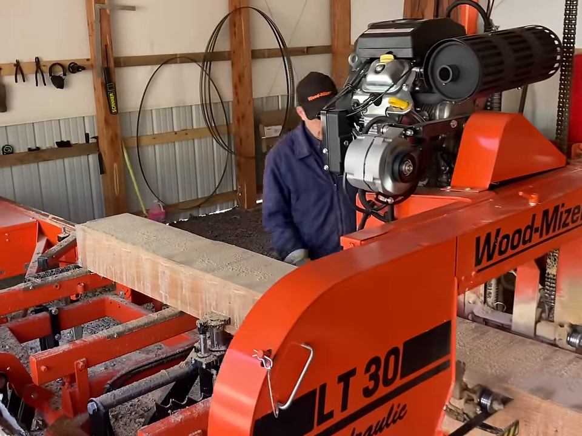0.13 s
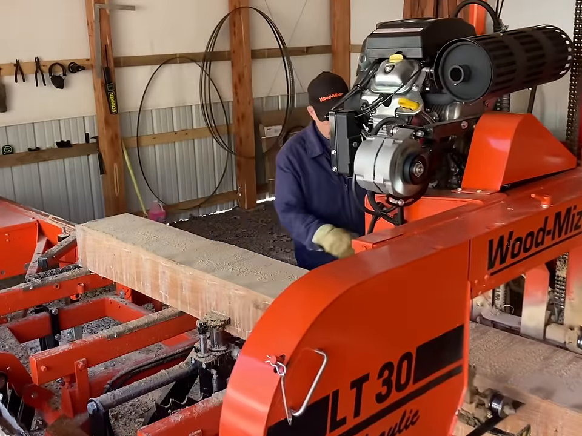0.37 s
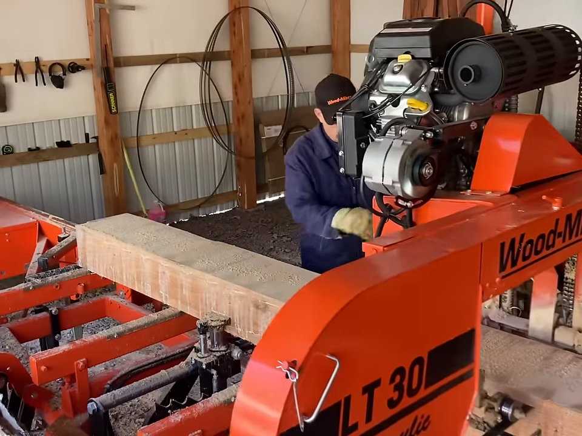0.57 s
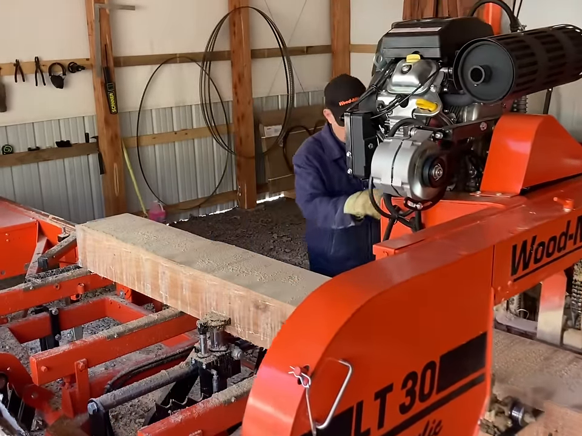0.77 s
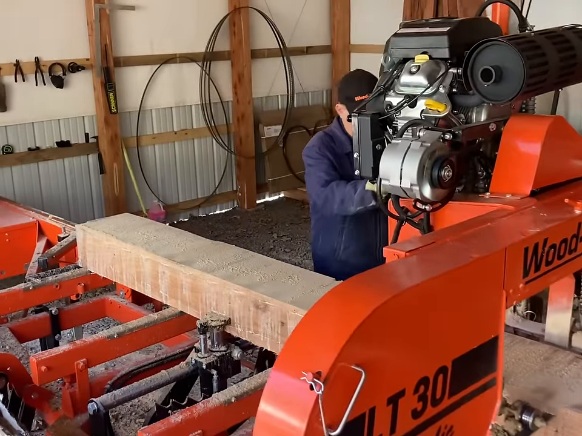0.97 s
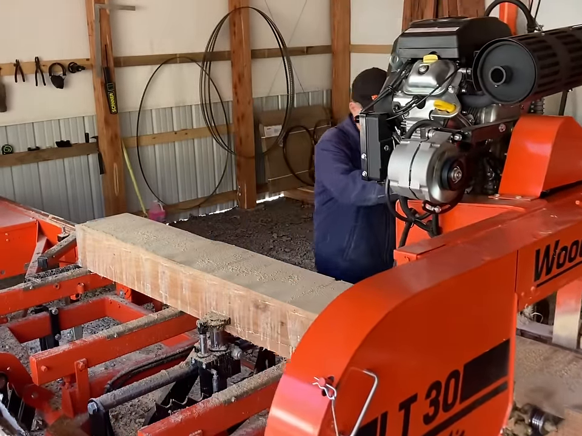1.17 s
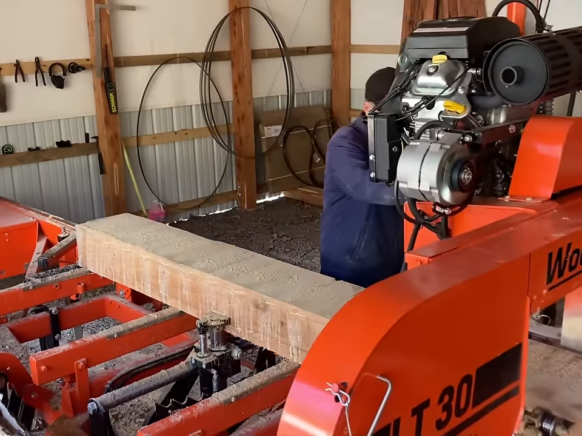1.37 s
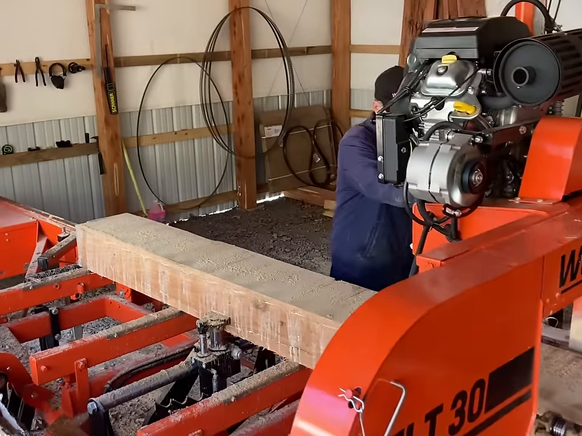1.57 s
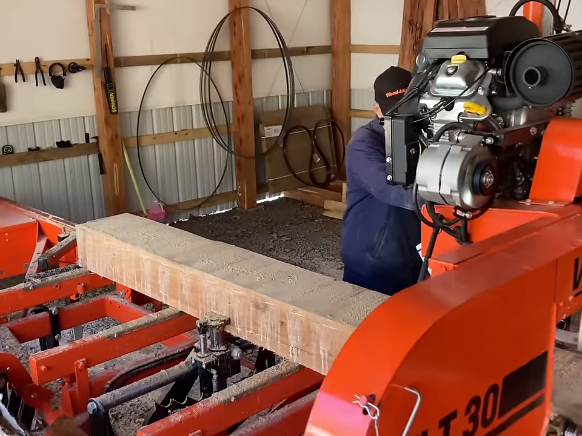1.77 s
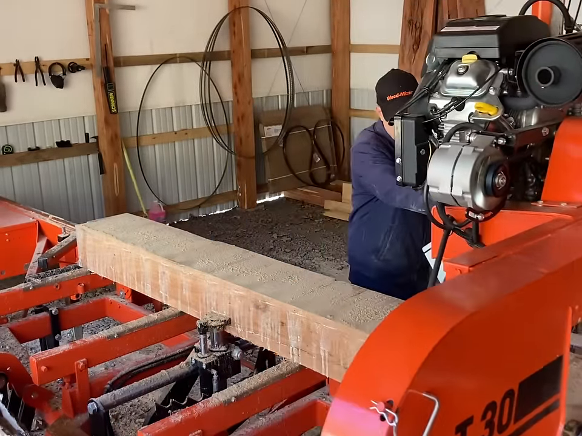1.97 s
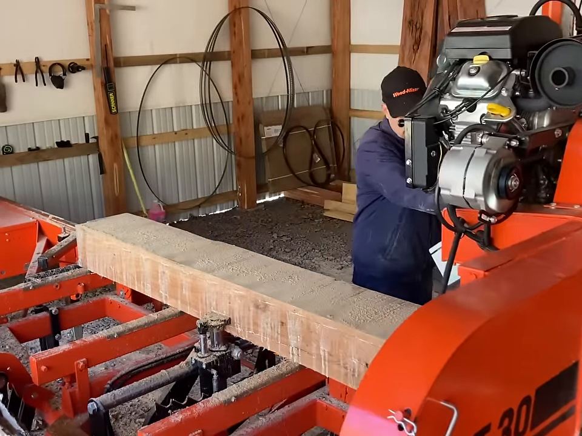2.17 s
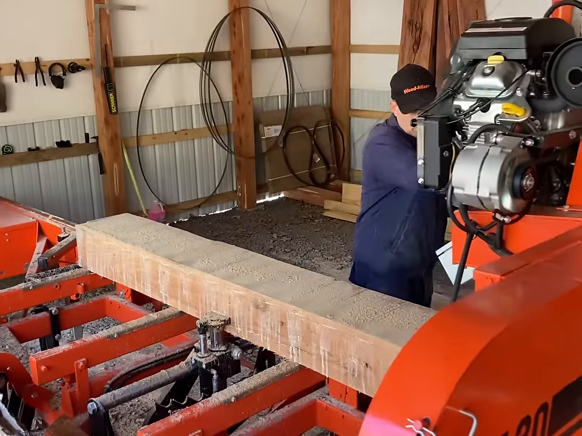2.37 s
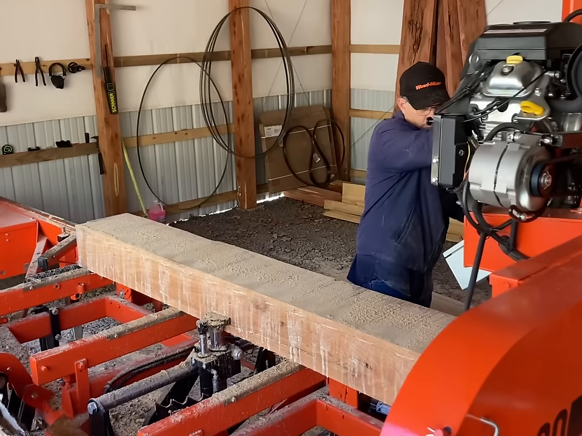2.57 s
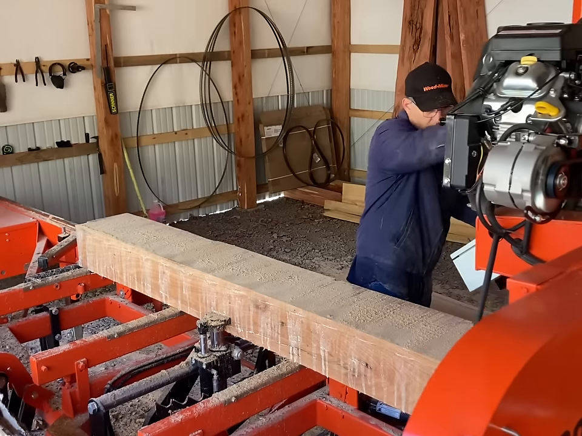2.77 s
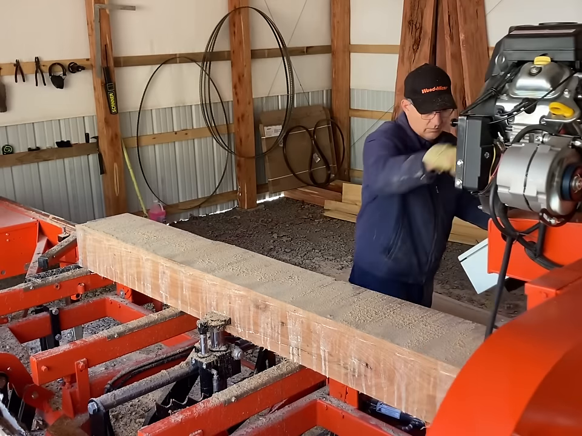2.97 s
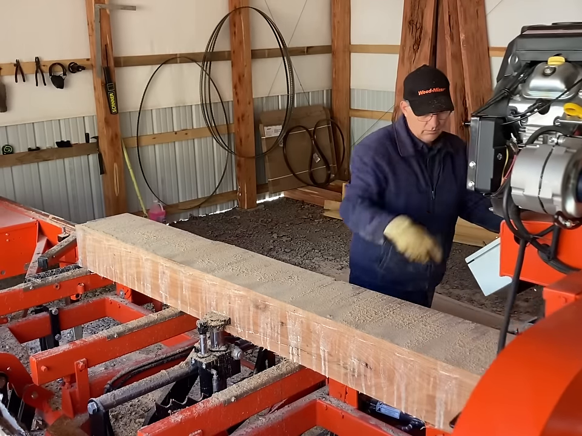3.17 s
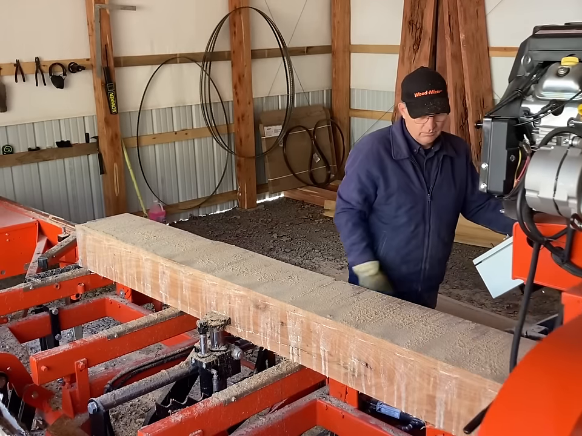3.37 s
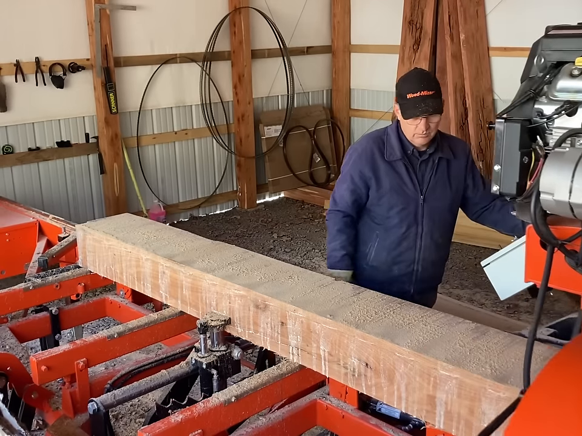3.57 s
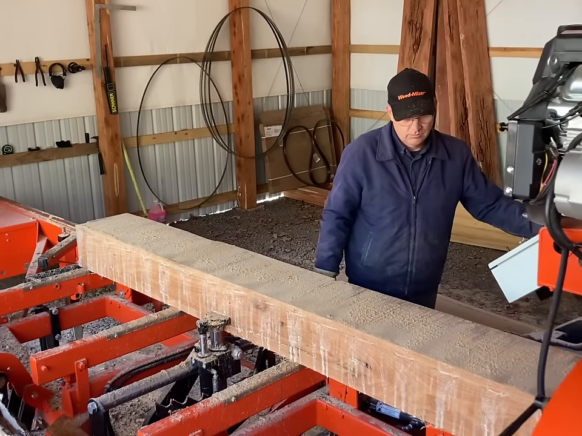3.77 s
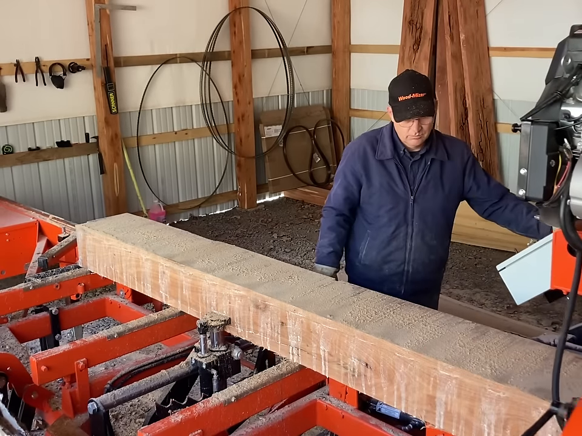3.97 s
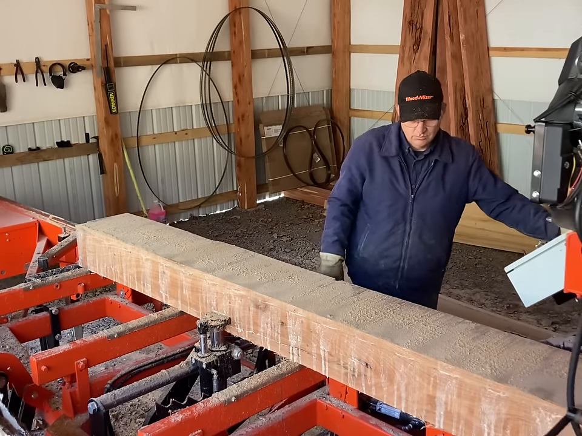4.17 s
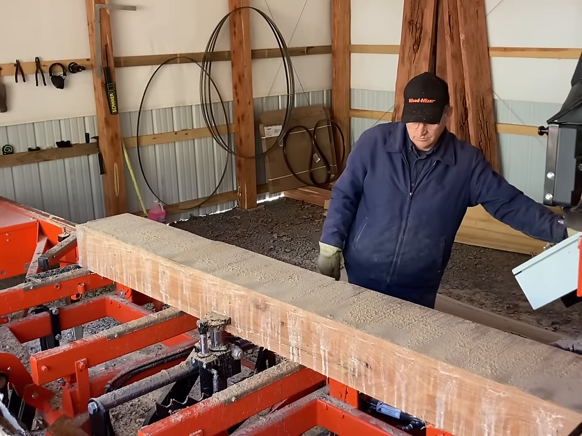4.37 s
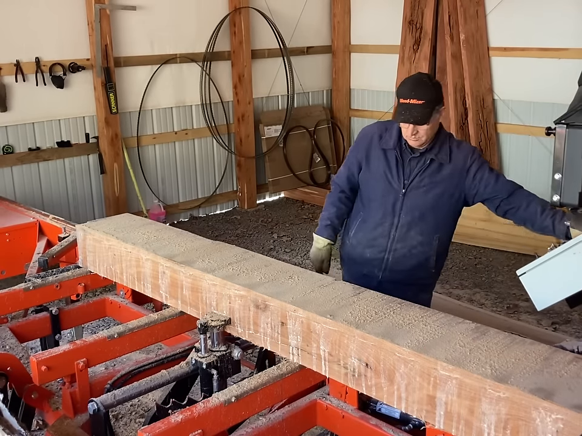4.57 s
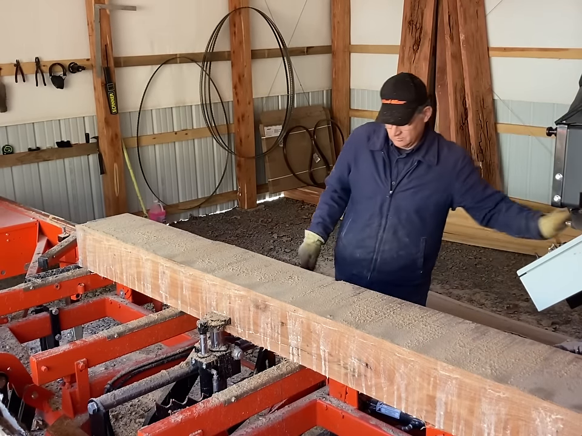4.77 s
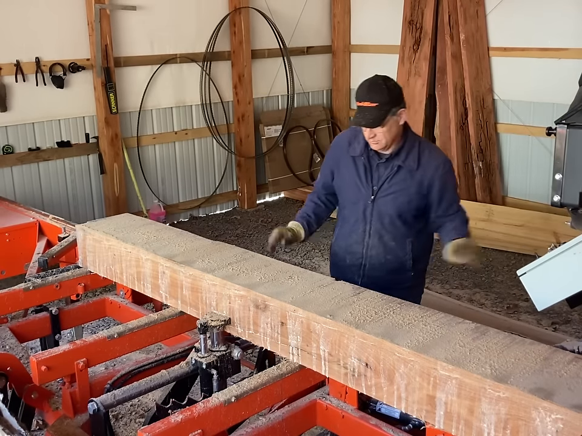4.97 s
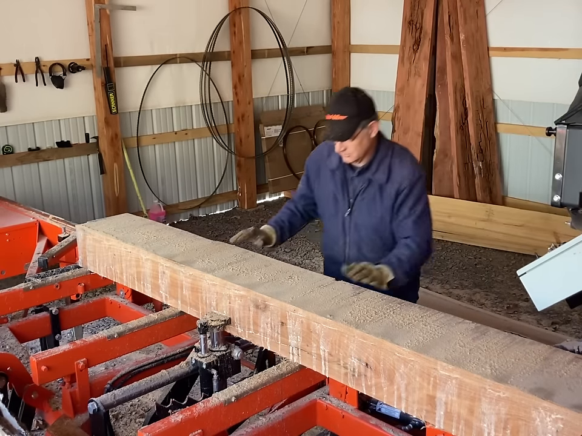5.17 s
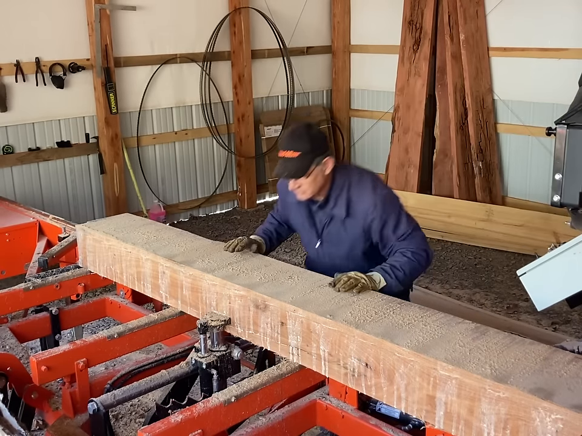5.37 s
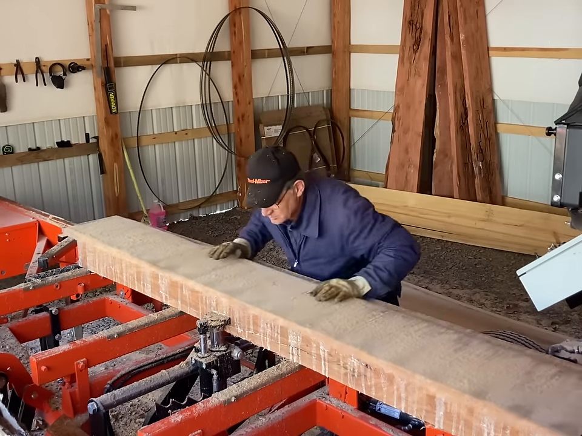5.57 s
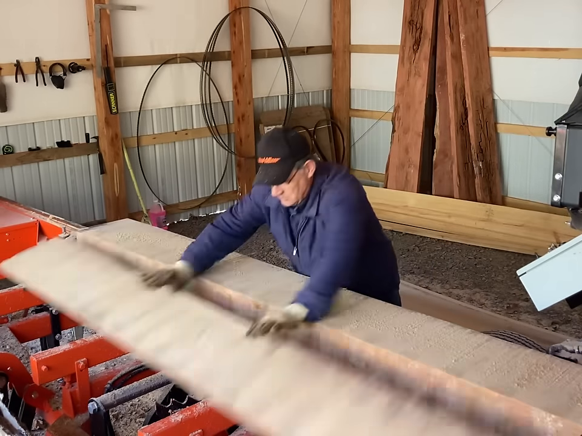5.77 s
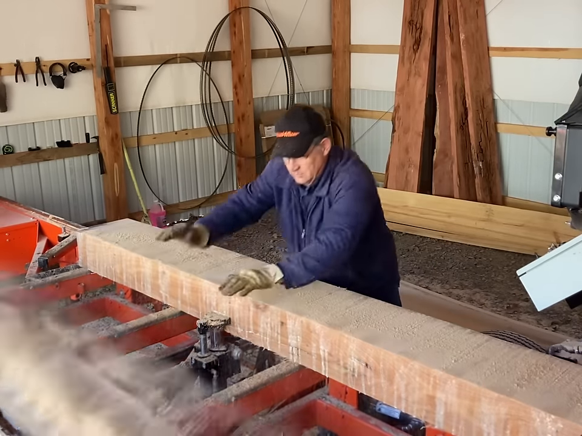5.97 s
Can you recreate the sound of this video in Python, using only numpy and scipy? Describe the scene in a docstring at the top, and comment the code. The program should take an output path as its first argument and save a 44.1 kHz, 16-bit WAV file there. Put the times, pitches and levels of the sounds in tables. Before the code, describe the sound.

A sawmill engine drones under load as its band blade rasps through wood, then throttles down to a lumpy idle before a board slams onto steel.

```python
"""A band sawmill in a shed: its V-twin engine pulls the blade through the end of a log, runs free,
is throttled back and settles to idle while the blade coasts to a stop. Then the sawn board is pushed
off the log and drops on the steel bed. Two close microphone ports hear the mill from the right.
The engine is a sum of exhaust notes plus clatter, ticks and fan whine; the blade is coloured noise,
the guards are short rattles, and the board is ringing knocks with scraping and echoes of the shed."""
import sys
import numpy as np
from scipy import signal
from scipy.fft import rfft, irfft, next_fast_len
from scipy.io import wavfile

SR = 44100
rng = np.random.default_rng(int(sys.argv[2]) if len(sys.argv) > 2 else 0)


def generate_wav(sig):
    """Save sig (samples, or channels by samples) to the path in sys.argv[1] as 16-bit PCM at SR."""
    pcm = np.round(np.clip(np.atleast_2d(sig).T, -1, 1) * 32767).astype(np.int16)
    wavfile.write(sys.argv[1], SR, pcm)


N = 265041

# how far the left port lags the right for sound from the mill: pitch_hz, lag_radians
MILL_LAG = [(0, 0), (250, .2), (700, 1.0), (1700, 1.7), (2300, 2.6), (3100, 2.4), (4000, 3.2), (4800, 4.2),
            (5900, 5.6), (6500, 6.3), (7200, 6.5), (16000, 18.9)]
# the same lag for sound from the blade and its guards: pitch_hz, lag_radians
BLADE_LAG = [(0, 0), (700, .8), (1700, 1.1), (2300, 0), (3300, .6), (4700, 3.1), (5400, 3.5), (6300, 6.1),
             (7200, 6.5), (16000, 18.9)]
LEAVES_LOG_S, UNLOAD_S = 2.02, .04   # the blade comes out of the log, and how long that takes
THROTTLE_SHUT_S = 2.5
RASP_FADE_DB_PER_S = 2   # the teeth and the guards both fade this fast


def from_db(db):
    """Turn a level in dB into a gain."""
    return 10 ** (np.asarray(db) / 20)


def rms_one(x):
    """Scale a sound to an average (rms) level of 1."""
    return x / np.sqrt(np.mean(x ** 2) + 1e-20)


def since(s):
    """Seconds gone since a moment, 0 before it."""
    return np.maximum(np.arange(N) / SR - s, 0)


def in_time(rows):
    """Join the rows of a table by straight lines: each column gets one value per sample."""
    s, *columns = np.transpose(rows)
    return [np.interp(np.arange(N) / SR, s, column) for column in columns]


def colour(x, points):
    """Filter with the given dB over frequency, without sounding ahead of its input (minimum phase)."""
    size = next_fast_len(N + SR, real=True) // 2 * 2
    hz = np.maximum(np.arange(size // 2 + 1) * SR / size, 1)
    points_hz, points_db = np.array(points).T
    log_gain = np.log(from_db(np.interp(np.log(hz), np.log(points_hz), points_db)))
    # folding the cepstrum (spectrum of the log gain) gives the phase that belongs to this gain
    cepstrum = irfft(log_gain, size)
    cepstrum[1:size // 2] *= 2
    cepstrum[size // 2 + 1:] = 0
    return irfft(rfft(x, size) * np.exp(rfft(cepstrum)), size)[..., :N]


def drift(rate):
    """Slow random wandering around 0 with spread 1; a higher rate wanders faster."""
    r = np.exp(-80 * np.pi * rate / SR)   # one step every 40 samples
    noise = rng.standard_normal(N // 40 + 2002)
    slow = signal.lfilter([1], [1, -2 * r, r * r], noise)[2000:]
    return np.interp(np.arange(N) / 40, np.arange(len(slow)), rms_one(slow))


def ports(x, lag, alike):
    """The left port hears x later; a second draw of the noise (alike) is added, unlike in each port."""
    # sound that differs in each port: pitch_hz, level_db
    diffuse = [(100, -20), (300, -17), (600, -3), (1200, -2), (2200, -5), (4500, -1), (6500, -5),
               (9000, -9), (15000, -7)]
    size = next_fast_len(N + SR // 10)
    radians = np.interp(np.arange(size // 2 + 1) * SR / size, *np.transpose(lag))
    late = irfft(rfft(x, size) * np.exp(-1j * radians), size)[:N]
    spread = colour(alike, diffuse)
    spread_late = np.concatenate([spread[:300], spread[:-300]])   # about 7 ms later
    return np.array([late + spread, x + spread_late])


def speed():
    """Working cycles per second: governed until the throttle shuts, then running down to idle."""
    # speed held by the governor: time_s, working_cycles_hz
    held = [(0, 29.3), (.35, 29.6), (1.42, 29.7), (1.87, 29.3), (2.05, 31.6), (2.2, 32), (2.5, 32.5)]
    idle_hz, sag_hz_per_s, run_down_s = 17.75, .085, .857   # the idle keeps sagging a little
    governed, after = in_time(held)[0], since(THROTTLE_SHUT_S)
    run_down = (governed - idle_hz) * (1 - np.exp(-after / run_down_s))
    return governed - run_down - sag_hz_per_s * after


def engine():
    """Sum the exhaust notes of two uneven firings a cycle, then add clatter, valve ticks and fan."""
    cycle_hz = speed()
    turns = np.cumsum(cycle_hz) / SR   # working cycles done so far
    second_firing = 3 / 8   # share of the cycle between the cylinders of a 90 degree twin
    exhaust = exhaust_notes(cycle_hz, turns, second_firing)
    # valves and intake clatter, surging after each firing
    beat = (1 + 0.27 * np.exp(-6.0 * (turns % 1))
            + 0.16 * np.exp(-6.0 * ((turns - second_firing) % 1)))
    # colour of the clatter: pitch_hz, level_db (per Hz)
    clatter_colour = [(40, -47), (120, -12), (300, 1.5), (450, -1.5), (560, -2.5), (700, -1.5),
                      (1050, -3.5), (1270, -5.5), (1510, -5), (1800, -8.5), (2500, -9), (3400, -8.5),
                      (4800, -15.5), (7000, -15.5), (8500, -21), (11700, -13.5), (13500, -22),
                      (15500, -22.5)]
    # working_cycles_hz, clatter_level_db
    clatter_by_speed = [(22, -63.5), (30, -57)]
    clatter = beat * rms_one(colour(rng.standard_normal((2, N)), clatter_colour))
    clatter_db = np.interp(cycle_hz, *np.transpose(clatter_by_speed)) + 1.6 * drift(21.0)
    clatter = from_db(clatter_db) * clatter
    sources = exhaust + clatter[0] + fan(turns) + valve_ticks(cycle_hz, turns)
    return ports(sources, MILL_LAG, clatter[1])


def exhaust_notes(cycle_hz, turns, second_firing):
    """Notes at multiples of the cycle change strength with load, throttle and firing."""
    # exhaust over time: time_s, level_db, unevenness (of the firings)
    course = [(0, -44.5, 0.19), (.9, -46, 0.19), (1.95, -46, 1.2), (2.08, -52.5, .4), (2.44, -50.5, .4),
              (2.5, -55, 0.83), (2.58, -50, .6), (2.8, -53.5, .7), (3.05, -56.5, 1.5), (3.3, -58, 1),
              (3.55, -61, .9), (3.68, -54.5, .7), (4.3, -54.5, 1), (4.9, -53.5, 1.6), (5.75, -53.5, 1.1)]
    # under load with the head close by: multiple (of the cycle), level_db
    cut_begins = [(1, -31), (2, -5.5), (3, -14), (4, -15), (5, 1), (6, -1), (7, -12.5), (8, -4.5),
                  (9, -1.5), (10, -15), (11, -28), (12, -32), (13, -3.5), (14, -19), (15, -41), (16, -13.5),
                  (17, -31), (18, -16), (19, -22), (20, -29), (21, -18), (22, -23), (23, -21), (24, -17),
                  (25, -22), (26, -31), (27, -14), (28, -31)]
    # under load later in the cut: multiple (of the cycle), level_db
    cut_later = [(1, -47), (2, -4.5), (3, -9.5), (4, -19), (5, 1), (6, -4), (7, -10), (8, -6), (9, -7.5),
                 (10, -13.5), (11, -14.5), (12, -19), (13, -5), (14, -17.5), (15, -29), (16, -14.5),
                 (17, -22), (18, -16), (19, -54), (20, -22.5), (21, -18), (22, -18.5), (23, -22), (24, -21),
                 (25, -60), (26, -18), (27, -19), (28, -30)]
    # out of the log, throttle still open: multiple (of the cycle), level_db
    running_free = [(1, -31), (2, -1), (3, 1.5), (4, -9), (5, 2.5), (6, -20), (7, -15), (8, 1.5), (9, -26),
                    (10, -24), (11, -13), (12, -26), (13, -16), (14, -30), (15, -21), (16, -23), (17, -31),
                    (18, -38), (19, -25), (20, -31), (21, -21), (22, -28), (23, -11), (24, -22), (25, -22),
                    (26, -34), (27, -27), (28, -21)]
    # the silencer with the throttle shut: pitch_hz, level_db
    silencer_points = [(18, -36), (36, -22), (45, -18), (62, -4.5), (80, -6), (95, -0.7), (110, 1.6),
                       (125, -8), (140, -10), (160, -7.5), (195, -21), (245, -10), (290, -14.5), (340, -24),
                       (420, -26.5), (650, -48)]
    # throttle shut: time_s, second_firing_share (of the first, 0-1), tilt_db_per_octave
    firing = [(2.52, 0.2, -5), (2.7, 0.3, -3), (2.9, 0.1, -2), (3.05, 0.2, -2), (3.2, 0.65, -2),
              (3.5, .65, -1), (3.7, 0.5, 0), (4.6, 0.5, -1), (5.0, .7, -1), (5.8, .7, -1)]
    shutting_s = .025
    rolls_on_s = .89   # the colour changes as the head rolls along the log
    exhaust_db, uneven = in_time(course)
    shut = np.minimum(since(THROTTLE_SHUT_S) / shutting_s, 1)
    free = np.minimum(since(LEAVES_LOG_S) / UNLOAD_S, 1)
    steps = np.arange(0, N, 64)   # the colour changes slowly, so work it out every 64 samples
    second, tilt, free, shut = (c[steps] for c in in_time(firing) + [free, shut])
    rolled = np.minimum(steps / SR / rolls_on_s, 1)
    silencer_hz, silencer_db = np.array(silencer_points).T
    exhaust, power = 0, 0
    for (order, begin_db), (_, later_db), (_, free_db) in zip(cut_begins, cut_later, running_free):
        cutting_db = begin_db + rolled * (later_db - begin_db)
        open_db = cutting_db + free * (free_db - cutting_db)
        # the two firings add or cancel
        meeting = np.cos(2 * np.pi * order * second_firing)
        both_db = 10 * np.log10(1 + second ** 2 + 2 * second * meeting + 1e-3)
        octaves = np.log2(order * cycle_hz[steps] / 150)
        silenced_db = np.interp(octaves, np.log2(silencer_hz / 150), silencer_db)
        shut_db = silenced_db + both_db + tilt * octaves
        gain = np.interp(np.arange(N), steps, from_db((1 - shut) * open_db + shut * shut_db))
        # phase of the sum of both firings
        half_way = np.pi * order * second_firing
        twin = -half_way + np.pi * (np.cos(half_way) < 0)
        ringing = 11.07 * np.log(order)   # radians: low notes linger longer in the silencer
        # firings differ, the upper notes waver more
        waver = (0.3 + 0.07 * order) * uneven * drift(7)
        note = np.cos(2 * np.pi * order * turns + twin - ringing + waver / 8)
        exhaust = exhaust + gain * from_db(waver) * note
        power = power + gain ** 2 / 2
    # even out the sum, then give it its level over time
    return exhaust / np.sqrt(power) * from_db(exhaust_db + 0.7 * uneven * drift(23.0))


def fan(turns):
    """The cooling fan whines at its blade rate; it comes out once the head has rolled off."""
    blades_per_cycle = 36
    level_db, heard_s, broken_db, fade_db_per_s = -71.5, 3.25, 1, .7
    before = np.maximum(heard_s - since(0), 0)   # rises 40 dB per second until it is heard
    whine_db = level_db - fade_db_per_s * since(heard_s) + broken_db * drift(4) - 40 * before
    return from_db(whine_db) * np.sin(2 * np.pi * blades_per_cycle * turns + .45 * drift(10))


def valve_ticks(cycle_hz, turns):
    """Each valve seating is a burst of coloured noise, at a fixed place in the working cycle."""
    # valves seating: place (share of the cycle), level_db
    valves = [(1, -1), (.3, -16), (0.62, -14)]
    # colour of the ticks: pitch_hz, level_db (per Hz)
    tick_colour = [(600, -10), (1050, 6), (1250, -13), (1500, 16), (1900, -16), (3500, -16), (5000, -3),
                   (5700, 12), (6300, -13), (7000, 3), (8200, 3), (10000, 8), (11800, 5), (13500, -8)]
    # working_cycles_hz, tick_level_db
    tick_by_speed = [(17.5, -73), (20, -81)]
    spread_db = 2.5   # from one cycle to the next
    closing = sum(from_db(db) * np.exp(-14.0 * ((turns - share) % 1)) for share, db in valves)
    closing = closing * from_db(spread_db * rng.standard_normal(200))[turns.astype(int)]
    tick = colour(rng.standard_normal(N) * closing, tick_colour)
    tick_db = np.interp(cycle_hz, *np.transpose(tick_by_speed)) + 2.0 * drift(12)
    return from_db(tick_db) * rms_one(tick)


def blade():
    """The band hisses and dulls as it slows; its teeth rasp in the cut and on to about throttle shut."""
    # hiss of the blade on wheels and guides: time_s, level_db
    course = [(0, -39.5), (.75, -38), (1.05, -40.5), (2.2, -41), (2.55, -38.5), (2.9, -41.5), (3.12, -46),
              (3.55, -60), (3.74, -61)]
    # colour of the hiss: pitch_hz, level_db
    hiss_colour = [(2500, -22), (4100, -15), (4900, -13), (5600, -12), (6400, -5.5), (7500, -3), (8500, -4),
                   (9600, -3), (11500, -1), (13000, -3), (14200, -4), (15300, -2), (17000, -4)]
    # colour of the rasping teeth: pitch_hz, level_db
    teeth_colour = [(500, 13), (1000, 2.5), (1600, -8.5), (2200, 4.5), (2800, 7.5), (3350, 12), (3800, 1),
                    (4400, -56), (6000, 5)]
    # colour of the hiss from where the head ends up: pitch_hz, level_db
    far_side = [(1500, 10), (2200, 8.5), (2800, 10.5), (3300, -1.5), (3800, -3), (4500, -1), (5200, 9.5),
                (6500, 3), (8000, -2.5), (15000, 1)]
    stops_s, stop_db_per_s = 3.74, 600
    bright_db_per_oct, dulls = 2.5, .5   # tilt from -41 dB up; it loses this much per dB below
    rasp_db, rasp_ends_s, rasp_end_db_per_s = -51, 2.48, 24
    gone_s, speeds_up = 2.8, 2.2   # the saw head rolls off to the right, gathering speed
    hiss_db = in_time(course)[0]
    tilt = bright_db_per_oct + dulls * np.minimum(hiss_db + 41, 0)
    hiss_db = hiss_db - stop_db_per_s * since(stops_s)
    teeth_db = rasp_db - RASP_FADE_DB_PER_S * since(0) - rasp_end_db_per_s * since(rasp_ends_s)
    grains = rng.standard_normal((5, N)) * from_db(2.0 * rng.standard_normal((5, N)))
    # split the hiss into bands so that its tilt can change and each band can flicker
    hiss, edges_hz = 0, [2000, 4700, 8000, 11000, 14000, 18000]
    coloured = rms_one(colour(grains[:3], hiss_colour))
    for low, high in zip(edges_hz, edges_hz[1:]):
        band_pass = signal.butter(3, [low, high], "band", fs=SR, output="sos")
        band = signal.sosfilt(band_pass, coloured)
        octaves = np.log2(max(np.sqrt(low * high), 5000) / 10000)
        hiss = hiss + band * from_db(tilt * octaves + 1.34 * drift(19.0))
    hiss = hiss * from_db(hiss_db + 0.12 * drift(40))
    passed = colour(hiss[2], far_side)
    rasp = rms_one(colour(grains[3:], teeth_colour)) * from_db(teeth_db + 1.0 * drift(37))
    # each working cycle tugs the band
    rasp = rasp * (1 + .35 * np.cos(2 * np.pi * np.cumsum(speed()) / SR))
    away = np.minimum(since(0) / gone_s, 1) ** speeds_up
    near = ports(hiss[0] * np.sqrt(1 - away) + rasp[0], BLADE_LAG, hiss[1] + rasp[1])
    return near + ports(passed * np.sqrt(away), MILL_LAG, 0 * away)


def guards():
    """In the log, each cycle jolts the guards: short noise rattles excite their resonances unevenly."""
    # resonances: pitch_hz, level_db, width_hz, hard_share (share taken of a hard rap)
    resonances = [(1026, 0, 220, 0.95), (2530, -5, 250, 0.18), (3290, -3.5, 110, 0.34),
                  (3610, 0.5, 180, 0.58)]
    # some raps stand out: time_s, extra_db (above the rest)
    hard_raps = [(.288, 7), (.356, 8), (.458, 4), (.49, 6), (.525, 7), (1.875, 9), (1.98, 6)]
    rap_share, scatter_s = .45, .002   # place in the cycle, and how late a rap may typically come
    rap_db, spread_db, rattle_s = -53, 3, .0052
    cycle = np.floor(np.cumsum(speed()) / SR - rap_share)
    starts = np.flatnonzero(np.diff(cycle) > 0)
    starts = starts[starts < (LEAVES_LOG_S + UNLOAD_S) * SR]
    chance = rng.standard_normal((len(starts), len(resonances) + 2))
    hard_db = np.zeros(len(starts))
    for s, db in hard_raps:
        hard_db[np.argmin(abs(starts / SR - s))] = db
    # hard raps stay in step, the others come a little late
    lateness = scatter_s * SR * abs(chance[:, 1]) * (hard_db == 0)
    starts = starts + lateness.astype(int)
    out = np.zeros((2, N))
    for (hz, db, width_hz, share), own in zip(resonances, chance.T[2:]):
        uneven_db = spread_db * (.8 * own + .6 * chance[:, 0]) * (1 - share / 2)
        fade_db = RASP_FADE_DB_PER_S * starts / SR
        jolts = np.full(N, 1e-18)
        jolts[starts] = from_db(rap_db + db + share * hard_db + uneven_db - fade_db)
        dying = signal.lfilter([1], [1, -np.exp(-1 / (rattle_s * SR))], jolts)
        rattle = dying * rng.standard_normal((2, N))
        # a resonator with the given pitch and width
        r, w = np.exp(-np.pi * width_hz / SR), 2 * np.pi * hz / SR
        feed = np.sqrt((1 - r * r) / 2) * np.array([1, 0, -1])
        out += signal.lfilter(feed, [1, -2 * r * np.cos(w), r * r], rattle)
    return ports(out[0], BLADE_LAG, out[1])


def board():
    """The board knocks and scrapes; the shed echoes the knocks."""
    # how far the left port lags the right for the board: pitch_hz, lag_radians
    board_lag = [(0, 0), (700, 0), (1200, -1.5), (2200, 0), (3800, .4), (5000, 2.1), (6900, 6.3),
                 (16000, 18.8)]
    knocks = board_knocks()
    scrape = board_scrape()
    return ports(knocks[0] + scrape[0], board_lag, knocks[1] + scrape[1]) + shed(knocks[0])


def board_knocks():
    """Each knock cracks, then rings the board's modes; low bending waves arrive last."""
    # time_s, strength_db (relative), hardness_hz (modes above it are struck weakly)
    knocks = [(4.748, -56, 150), (5.833, -38, 1200), (5.838, -39, 2200), (5.844, -35, 700),
              (5.853, -43, 900), (5.861, -14.5, 3740), (5.866, -17, 2300), (5.871, -42, 900),
              (5.879, -23, 1100), (5.895, -30.5, 1100), (5.907, -37, 1000), (5.921, -41, 1200),
              (5.929, -47, 2400), (5.938, -30, 1180), (5.950, -54, 1200), (5.961, -37, 1500),
              (5.965, -35, 1000), (5.972, -38, 3000), (5.978, -22.5, 900), (5.983, -24.5, 700),
              (5.997, -35, 2200), (6.001, -30.5, 800)]
    # modes of the board: pitch_hz, level_db (relative), t60_s (time to fall by 60 dB)
    modes = [(114.7, -1.5, 0.17), (203, -0.5, 0.052), (293.7, -3.5, 0.2), (367, 7.5, 0.029),
             (483, 2.5, 0.073), (626, 11, 0.016), (800, -6, 0.073), (1070, -12, 0.24), (1130, -10, 0.098),
             (1365, -8.5, 0.037), (1626, 4.5, 0.02), (1836, 5.5, 0.019), (2110, 1, 0.015),
             (2480, -8, 0.021), (2860, -16, 0.023), (3540, -15, 0.015), (4400, -17, 0.013)]
    spread_db = 2.0   # each knock strikes the modes differently
    out = np.zeros((2, N))
    strength = rng.normal(0, spread_db, (len(knocks), 2, len(modes)))
    for (s, knock_db, hard_hz), own_db in zip(knocks, strength):
        start = round(s * SR)
        t = np.arange(min(N - start, SR // 3)) / SR
        end = start + len(t)
        noise = signal.lfilter([1], [1, -.55], rng.standard_normal((2, SR // 3)))[:, :len(t)]
        crack = noise * from_db(-60 * t / .03)
        out[:, start:end] += crack * from_db(knock_db - 24) * (hard_hz / 4000) ** 3
        for (hz, level_db, t60), db in zip(modes, own_db.T):
            gain = from_db(knock_db + level_db - 16.0 + db) / np.sqrt(1 + (hz / hard_hz) ** 4)
            late = np.maximum(t - 0.1595 / np.sqrt(hz) + 0.00351, 0)   # seconds since arrival
            rise = 1 - np.exp(-late * hz * 2.1)
            ring = rise * np.sin(2 * np.pi * hz * late) * from_db(-60 * late / t60)
            out[:, start:end] += gain[:, None] * ring
    return out


def board_scrape():
    """Random clicks of grit, coloured, swell up to each landing and fade after it."""
    # the board scrapes around each landing: time_s, level_db
    landings = [(5.88, -45), (5.985, -48)]
    # colour of the scrape: pitch_hz, level_db
    slide_colour = [(30, -42), (80, -15), (140, 2), (350, 13.5), (650, 12), (1100, 7), (1900, -2),
                    (3000, -14), (8000, -26), (15000, -52)]
    starts_s, swell_db_per_s, fade_db_per_s, grit_db = 4.7, 397, 161, -2
    now, level = since(0), 0
    for s, db in landings:
        db_per_s = np.where(now < s, swell_db_per_s, fade_db_per_s)
        level = level + from_db(db - db_per_s * abs(now - s))
    level = level * np.minimum(since(starts_s) / .01, 1)
    hits = rng.random((2, N)) < 4000 / SR   # about 4000 clicks a second
    sizes = from_db(grit_db * np.minimum(rng.exponential(1, (2, N)), 4))
    grit = rng.choice([-1, 1], (2, N)) * hits * sizes
    return rms_one(colour(grit, slide_colour)) * level * from_db(6.5 * drift(53))


def shed(x):
    """Walls and roof send back dense dying echoes, other ones in each port."""
    # colour of the echo: pitch_hz, level_db
    echo_colour = [(100, -12), (300, -3), (1000, 4), (1700, 0), (2500, 3), (3200, 10), (5000, 4),
                   (9000, -6)]
    t60_s, echo_db = .35, -12
    t = np.arange(SR // 2) / SR
    fade_in = np.clip(t / 0.0034 - 1, 0, 1)   # silent for 3.4 ms, full after as long again
    echoes = rng.standard_normal((2, len(t))) * from_db(-60 * t / t60_s) * fade_in
    echoes = echoes / np.sqrt(np.sum(echoes ** 2, axis=1, keepdims=True))
    echoed = signal.fftconvolve(x[None], echoes, axes=1)[:, :N]
    return from_db(echo_db) * colour(echoed, echo_colour)


def scene():
    """Engine, blade, guards and board together."""
    return engine() + blade() + guards() + board()


def record(dry):
    """The case shades the left port; the deepest bass and the top are cut."""
    # shading by the case: pitch_hz, level_db
    left_port = [(360, 0), (470, -7.5), (650, -7), (950, -2.5), (1500, 0), (2200, 0), (4000, 0)]
    bass_cut_hz, top_gone_hz = 42, 16000   # from top_gone_hz up all is 60 dB down
    shaded = np.array([colour(dry[0], left_port), dry[1]])
    shaded = signal.sosfilt(signal.butter(2, bass_cut_hz, "high", fs=SR, output="sos"), shaded)
    return signal.sosfilt(signal.cheby2(22, 60, top_gone_hz, fs=SR, output="sos"), shaded)


dry = scene()
out = record(dry)
generate_wav(out)
```